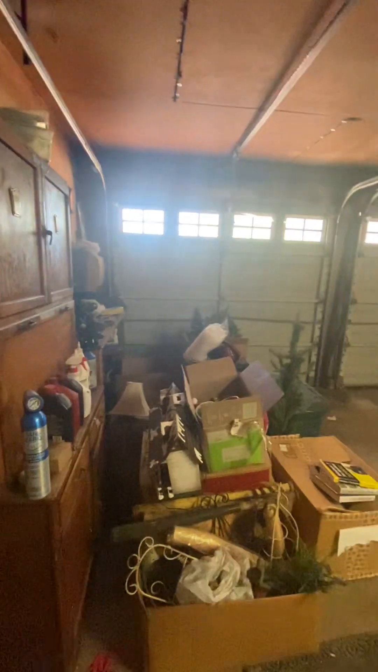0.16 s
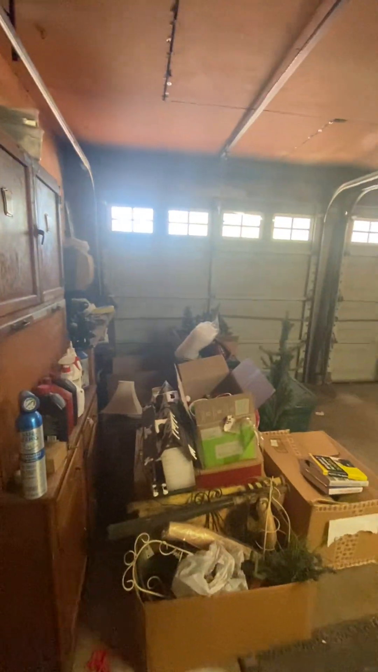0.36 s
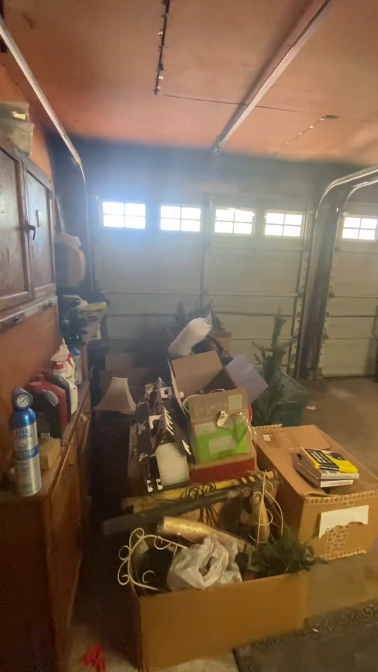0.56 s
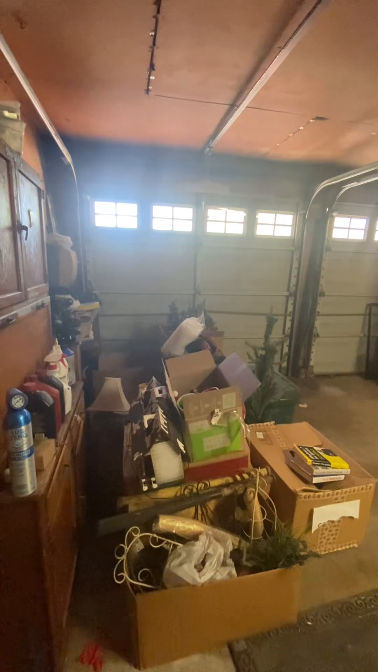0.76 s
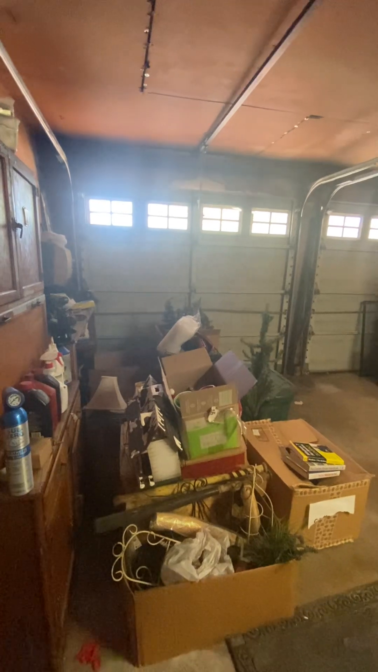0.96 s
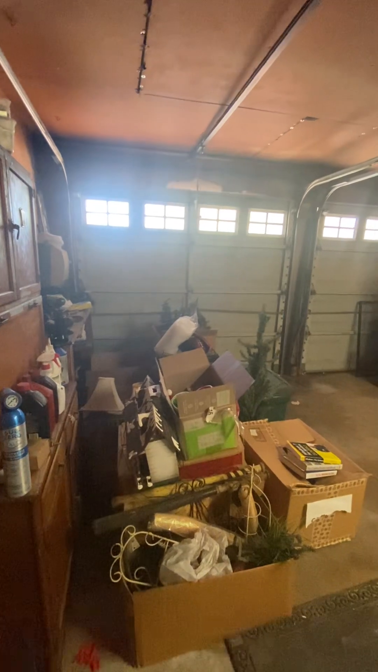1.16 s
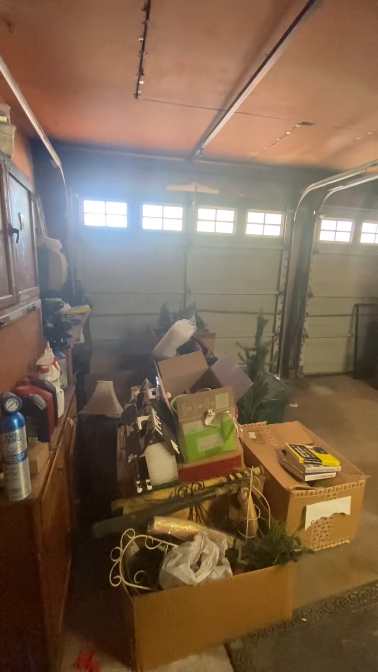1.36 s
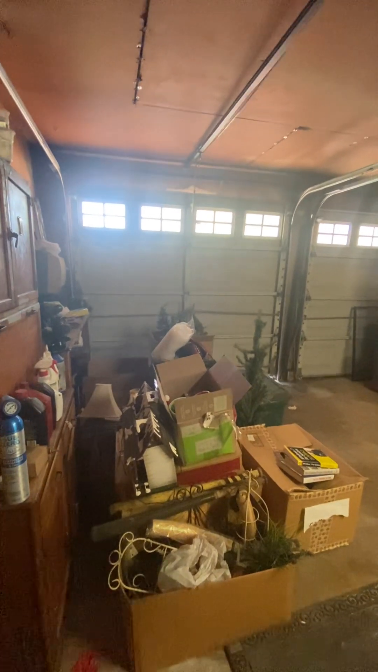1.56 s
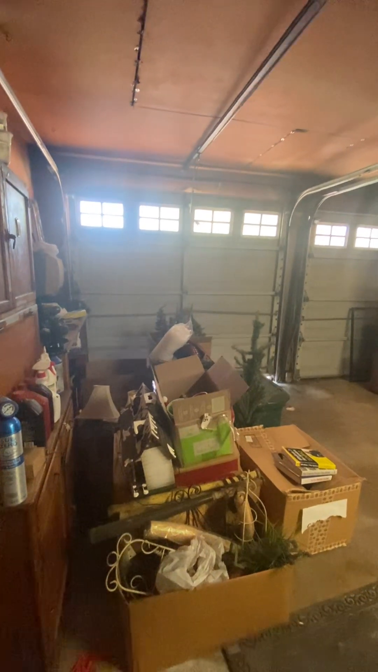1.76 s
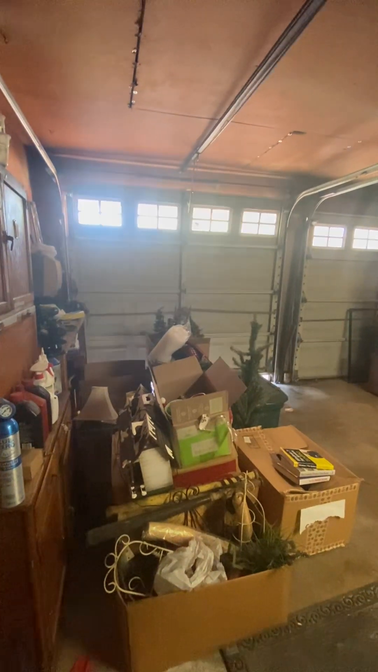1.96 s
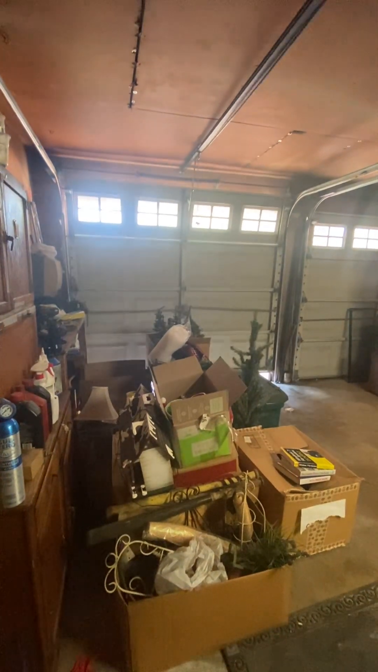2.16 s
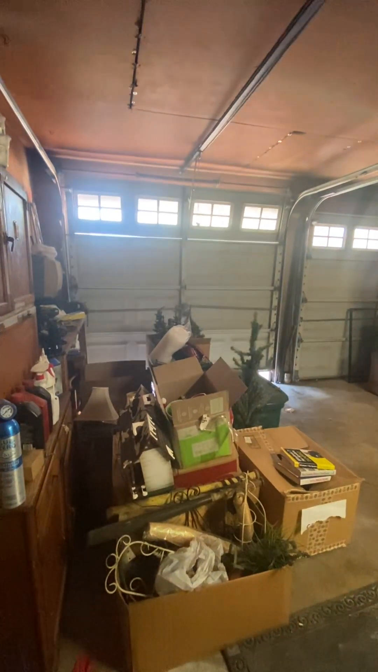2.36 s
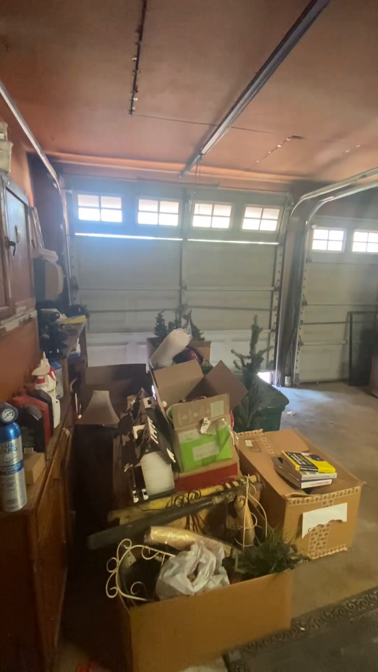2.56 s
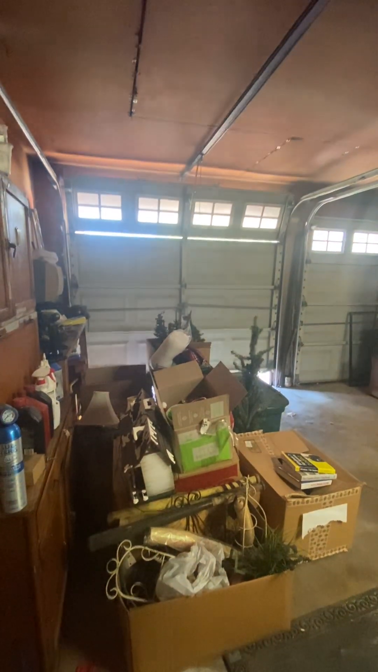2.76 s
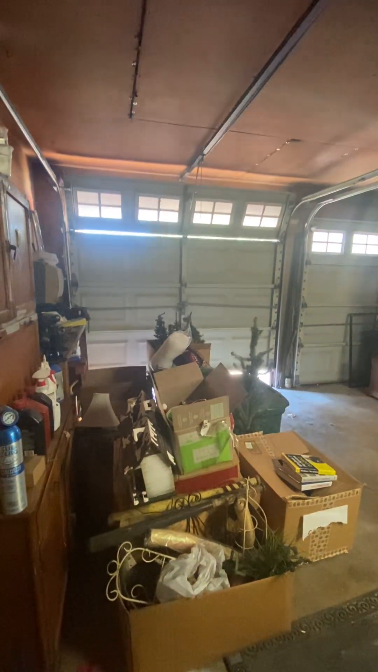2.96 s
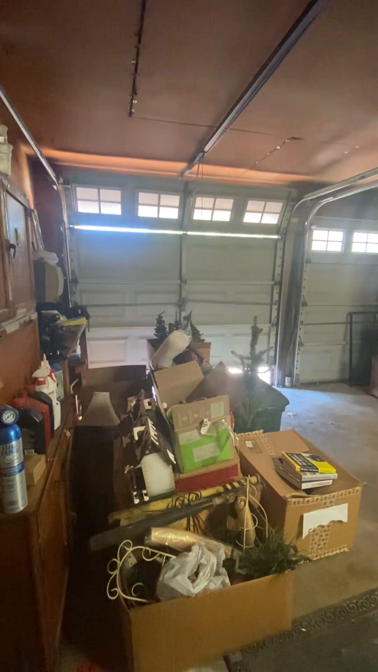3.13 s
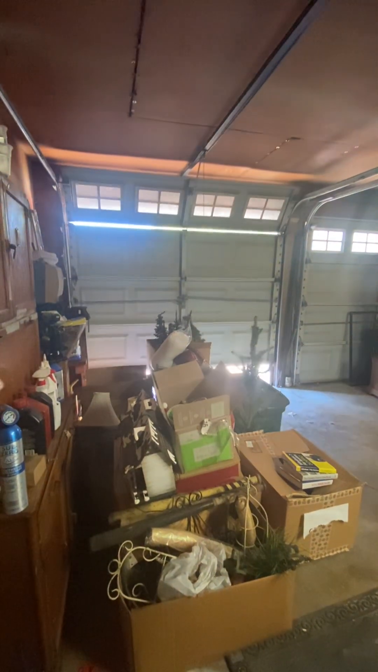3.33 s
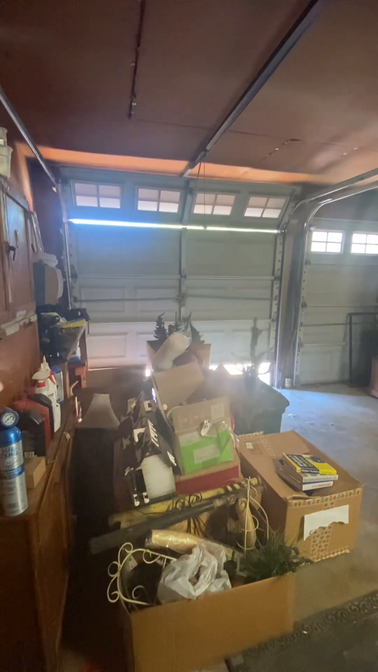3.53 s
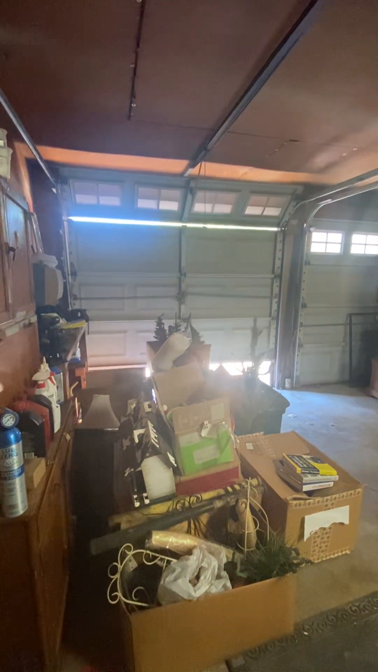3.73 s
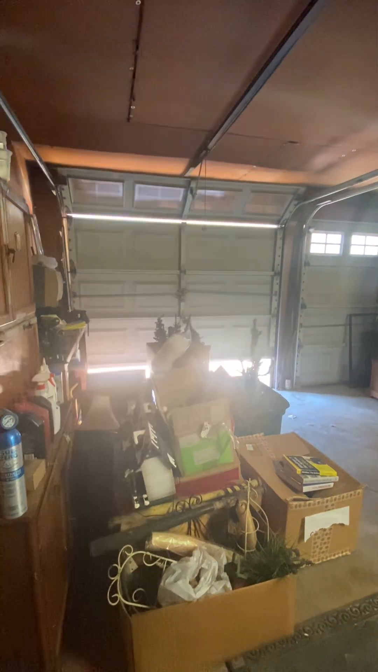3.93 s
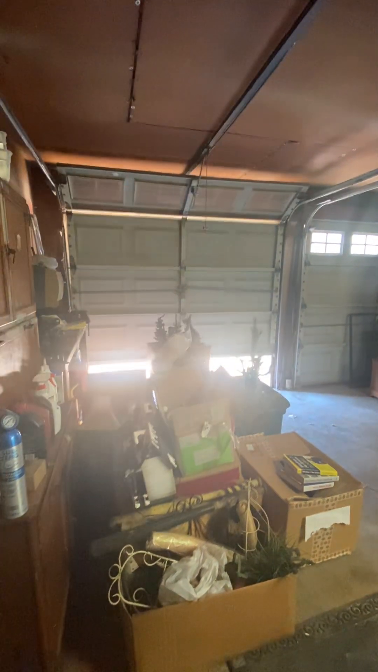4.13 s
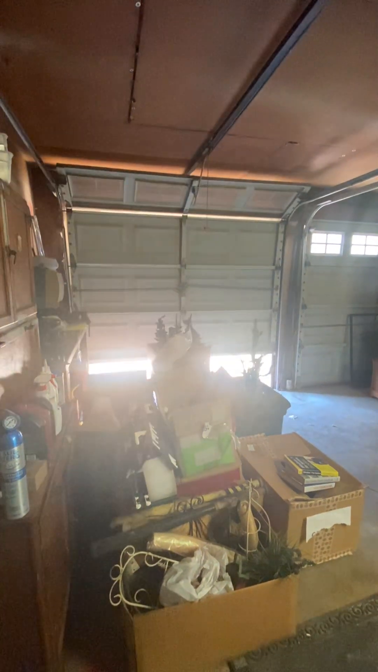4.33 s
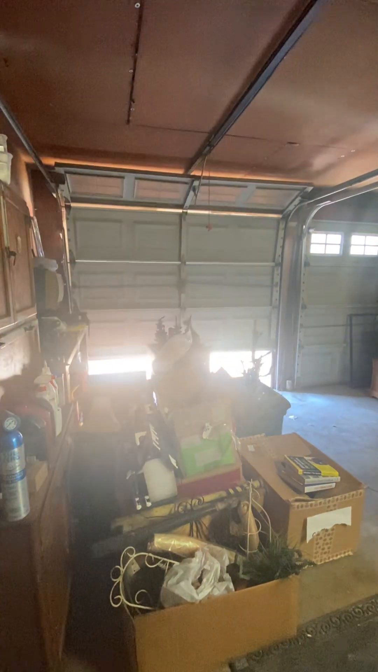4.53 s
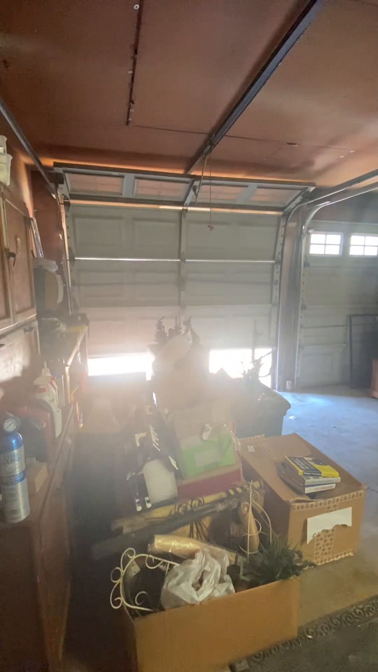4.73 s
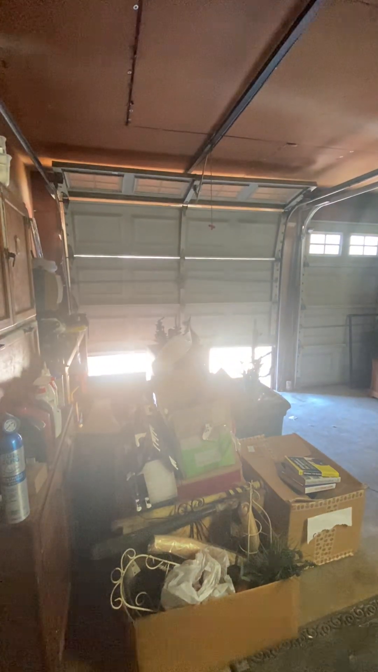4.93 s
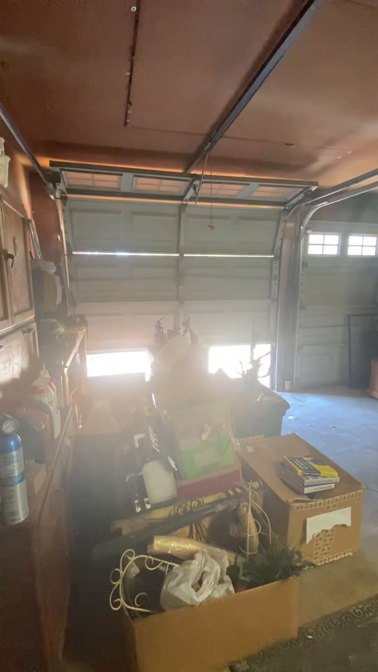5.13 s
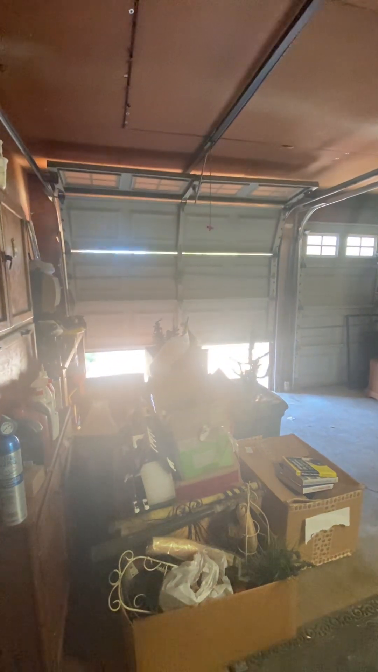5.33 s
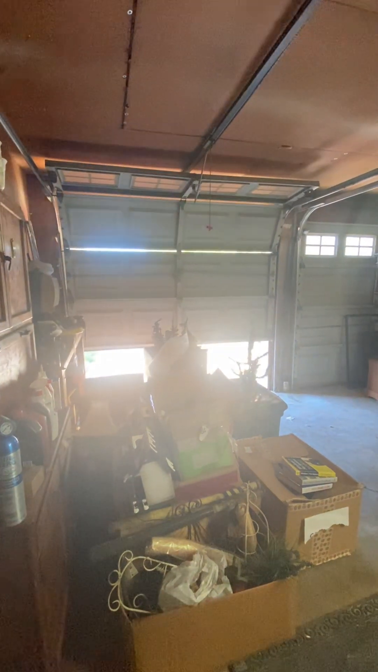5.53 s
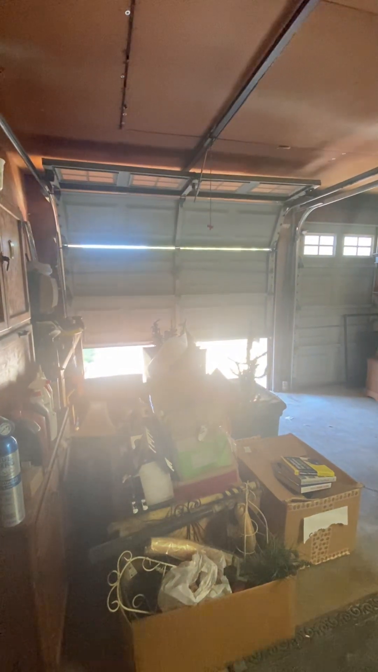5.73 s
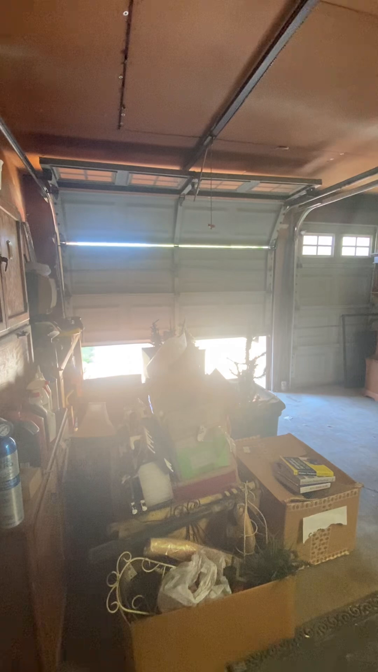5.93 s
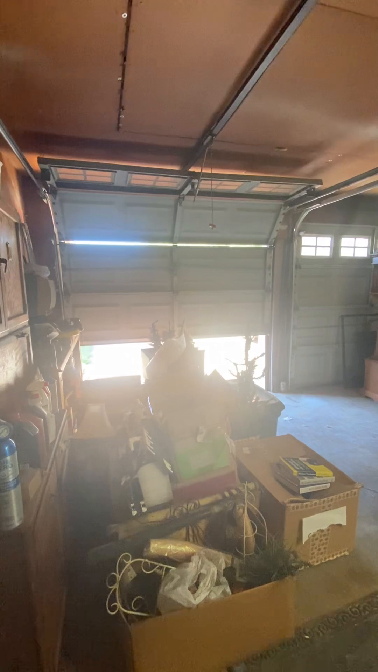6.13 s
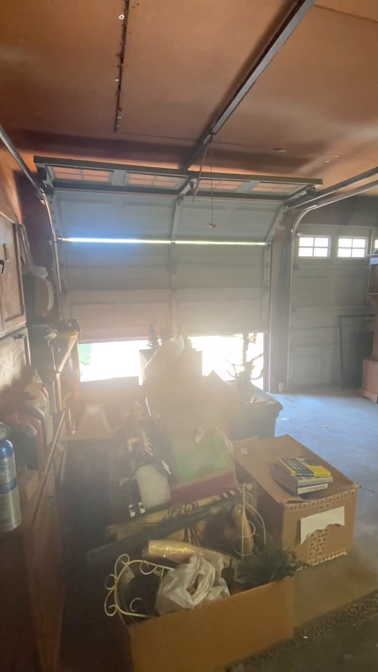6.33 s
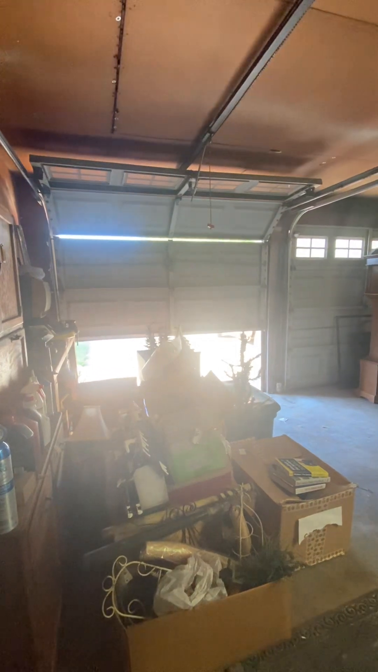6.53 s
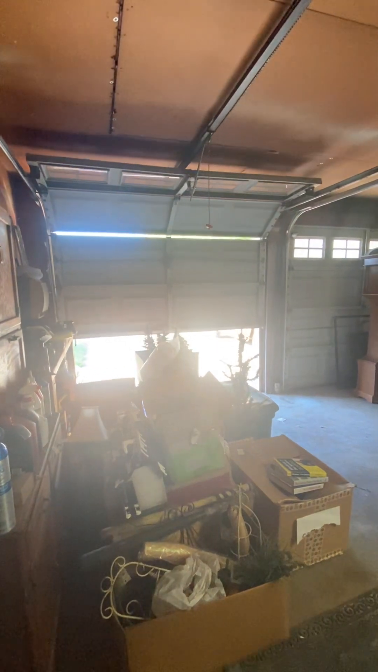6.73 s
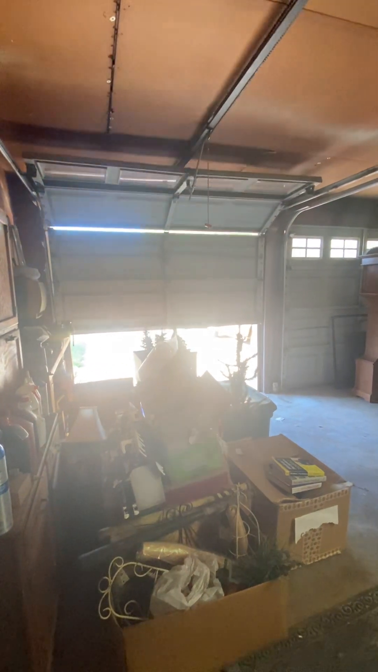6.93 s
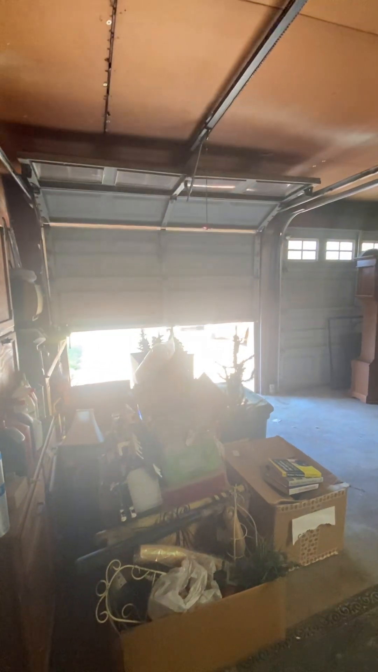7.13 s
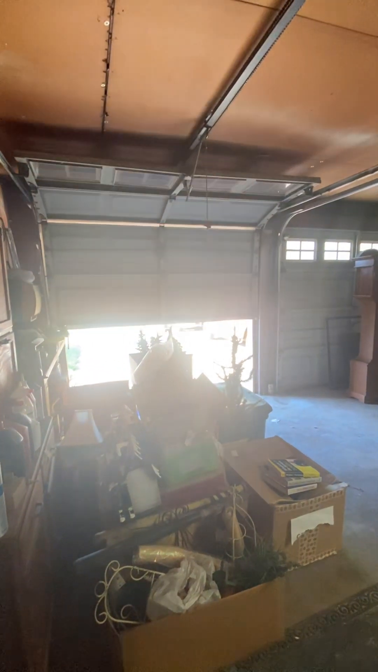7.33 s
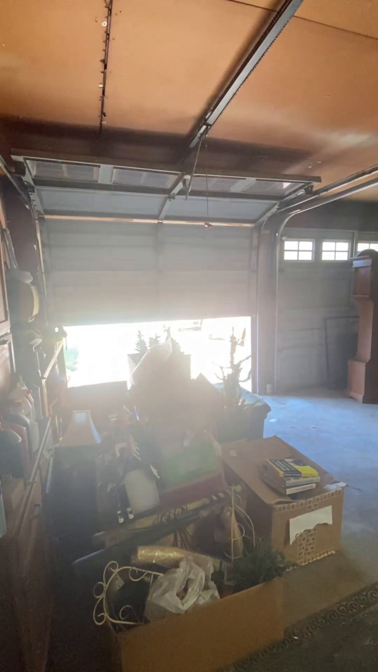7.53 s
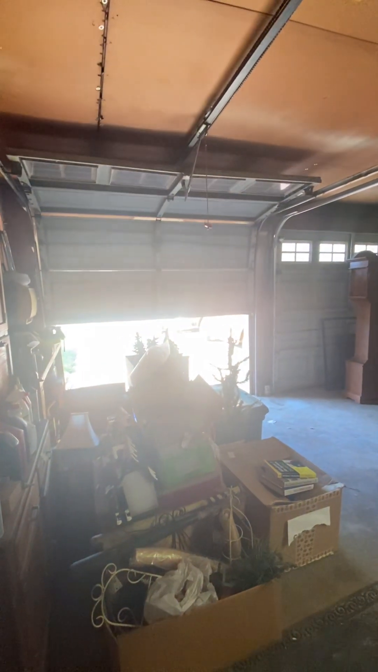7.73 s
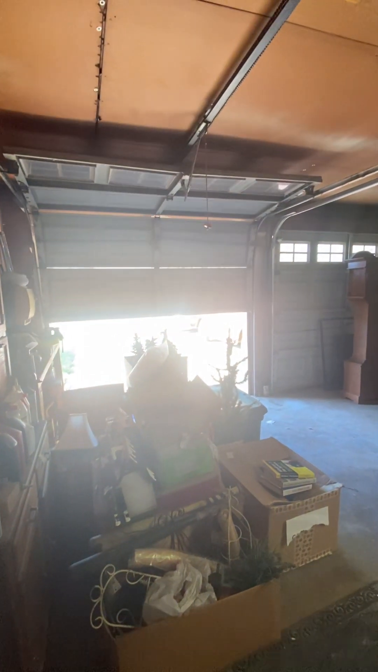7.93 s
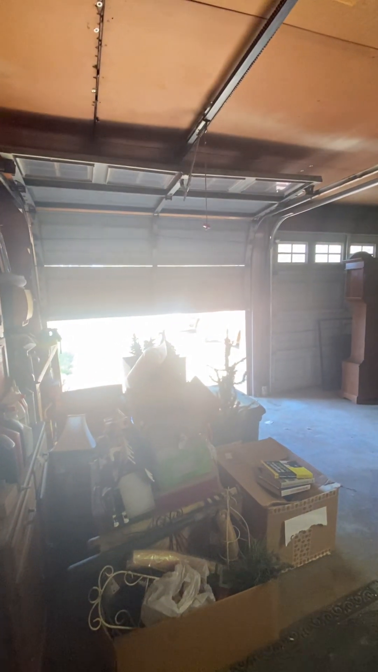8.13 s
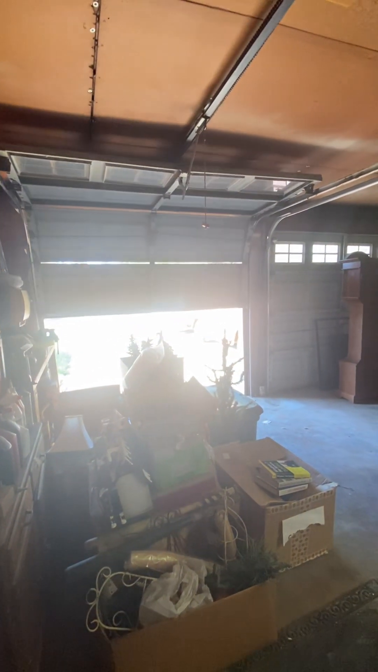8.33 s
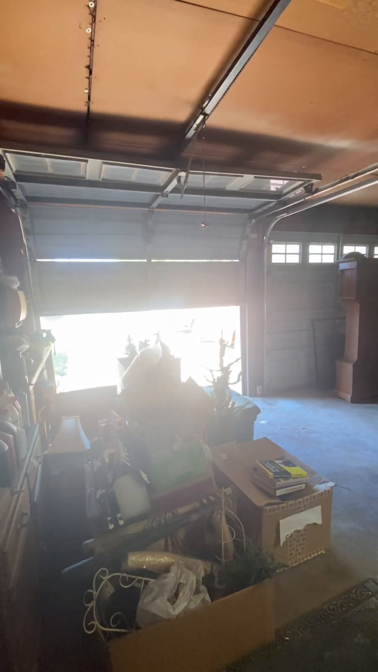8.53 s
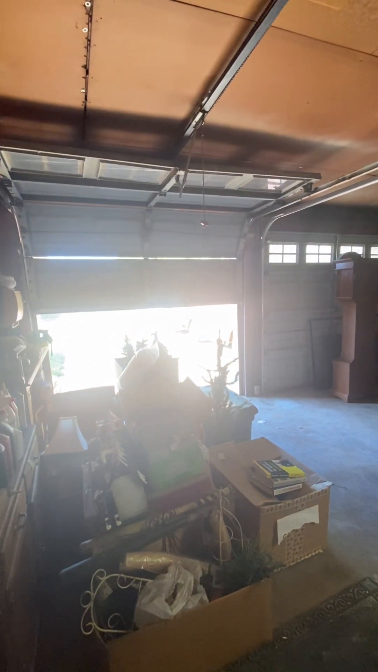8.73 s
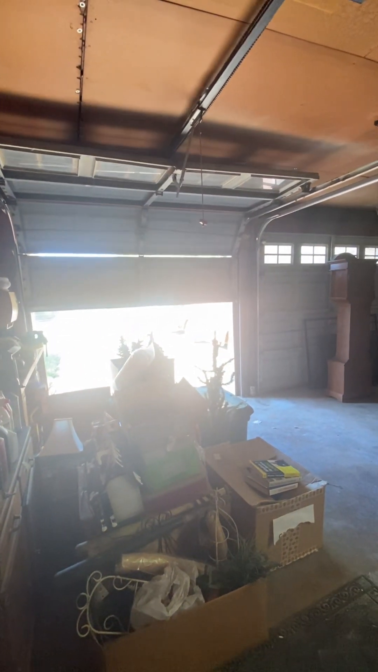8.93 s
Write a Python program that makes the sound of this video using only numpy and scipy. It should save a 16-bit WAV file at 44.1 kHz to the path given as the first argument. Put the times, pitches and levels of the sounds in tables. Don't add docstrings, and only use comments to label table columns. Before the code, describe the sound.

Nearly quiet indoor room with soft cloth rustle and tiny plastic clicks right by the microphone, then a sudden motor start. A mains hum and rough mid-range gear growl fill the resonant garage while a sectional door rises, rumbling and rattling. Early knocks and a cluster of bangs give way to a steadier drone with scattered bright ticks and a slightly more singing tone, still running when it stops.

```python
import sys
import numpy as np
from scipy import signal
from scipy.fft import rfft, irfft, next_fast_len
from scipy.io import wavfile
from scipy.ndimage import uniform_filter1d, map_coordinates

SR = 44100
rng = np.random.default_rng(int(sys.argv[2]) if len(sys.argv) > 2 else 0)


def dump_mix(stems):
    frames = np.atleast_2d(stems).T
    limited = np.clip(frames, -1, 1)
    pcm = np.round(limited * 32767).astype(np.int16)
    wavfile.write(sys.argv[1], SR, pcm)


def nominal_scale(level):
    x = np.asarray(level, float) / 20
    return 10 ** x


N = 396018
T = np.arange(N) / SR
START_S = .843


def unit(x):
    return x / np.sqrt(np.mean(x ** 2) + 1e-20)


def along(points, hz, column=1):
    rows = np.transpose(points)
    return np.interp(np.log(hz + 1), np.log(rows[0] + 1), rows[column])


def curves(rows):
    s, *cols = np.transpose(rows)
    return [np.interp(T, s, c) for c in cols]


def wobble(rate):
    coarse = T[::16]
    knots = rng.standard_normal(int(N * rate / SR) + 4)
    return np.interp(T, coarse, map_coordinates(knots, [coarse * rate]))


def add(track, s, sound):
    track[round(s * SR):][:len(sound)] += sound


def filtered(x, response):
    m = next_fast_len(N + SR // 2)
    return irfft(rfft(x, m) * response(np.fft.rfftfreq(m, 1 / SR)), m)[..., :N]


def body(spectrum, modes=()):
    def response(f):
        power = nominal_scale(2 * along(spectrum, f))
        for centre, width, db in modes:
            power = power + nominal_scale(2 * db) / (1 + (2 * (f - centre) / width) ** 2) ** 2
        return np.sqrt(power)
    return response


def shaken(response, patchy_db, force=1):
    noise = force * rng.standard_normal((2, N))
    if patchy_db:
        z = signal.stft(noise, nperseg=512)[2]
        field = uniform_filter1d(rng.standard_normal(z.shape[1:]), 5, 0)
        field = uniform_filter1d(field, 8, 1)
        noise = signal.istft(z * nominal_scale(patchy_db * unit(field)), nperseg=512)[1][:, :N]
    return unit(filtered(noise, response))


# multiple of twice the mains rate, level in dB,
# left over right in dB, lead of the left in radians.
HUM = [(1, -26.1, -3.4, -0.0), (2, -41.8, -5.0, -0.0), (3, -36.0, -3.9, 0.6), (4, -49.2, -6.5, 1.8),
       (5, -46.0, -0.5, 2.0), (7, -52.2, 4.7, 2.1), (8, -52.1, -1.7, 1.7), (10, -63.3, 12.4, -3.1),
       (12, -66.2, -0.6, 0.4)]
# time in seconds, level in dB.
FIELD = [(.9, -27), (1.35, -24), (1.55, -27), (1.94, -26.5), (2.46, -23.5), (2.69, -27.5), (2.8, -24.5),
         (3.85, -25), (5.12, -27.5), (6.35, -25.5), (8.39, -28.5), (8.55, -27.5), (8.98, -28.5)]
# time in seconds, level in dB.
THIRD = [(.9, -48), (1.5, -38), (2, -37), (2.4, -39), (2.9, -39), (3.4, -38.5), (3.9, -42), (4.3, -39.5),
         (4.6, -34.5), (5.2, -39.5), (5.7, -36), (6.2, -38), (6.6, -35), (7.3, -40.5), (7.7, -38),
         (8, -35.5), (8.5, -42.5), (8.98, -38)]
PULL_HZ = 120
FIELD_S, SWELL_S = .8797, .018


def hum():
    side = np.array([[.5], [-.5]])
    t = T - FIELD_S
    field_db = curves(FIELD)[0]
    out = 0
    for k, db, pan_db, lead in HUM:
        unsteady = k > 1
        drift = unsteady * .3 * wobble(5)
        if k == 3:
            level_db = curves(THIRD)[0] + 1.7 * wobble(13)
        else:
            level_db = field_db - .2 + db - HUM[0][1] + unsteady * 1.2 * wobble(6)
        tone = np.cos(2 * np.pi * k * PULL_HZ * t + drift + side * lead)
        out = out + nominal_scale(level_db + side * pan_db) * tone
    return np.sqrt(2) * out * (1 - np.exp(-np.maximum(t, 0) / SWELL_S)) ** 2


# time in seconds, turns per second.
SHAFT = [(.84, 7.2), (1.0, 27), (1.7, 27.5), (2.7, 27.9), (3.7, 28.05), (4.7, 28.15), (6, 28.35),
         (7.7, 28.15), (9, 28.4)]


def shaft():
    return np.cumsum(curves(SHAFT)[0] + .065 * wobble(2.5)) / SR


# multiple of the pull rate, multiple of the shaft rate, level in dB.
ROTOR = [(0, 1, -66), (0, 2, -58), (0, 4, -56), (1, 1, -53), (0, 6, -56), (0, 8, -50), (3, -4, -51),
         (0, 10, -56), (3, 2, -56), (5, 4, -54), (0, 20, -61), (5, 5, -58), (5, -2.4, -61)]


def rotor(turns):
    out = 0
    for pulls, k, db in ROTOR:
        phase = 2 * np.pi * (pulls * PULL_HZ * T + k * turns)
        out = out + nominal_scale(db + 3.8 * wobble(3)) * np.sin(phase + .37 * wobble(3))
    return out


COVER_HZ, COVER_DB = 353.3, -45
COVER_WAKES_S, COVER_RISE_S, COVER_GAINS_DB = 4.2, .9, 8
LAST_BEND_S, LAST_BEND_DB = 8.5, 4


def cover():
    woken_db = COVER_GAINS_DB / (1 + np.exp((COVER_WAKES_S - T) / COVER_RISE_S))
    freed_db = LAST_BEND_DB * np.clip(10 * (T - LAST_BEND_S), 0, 1)
    level_db = COVER_DB + woken_db + freed_db + 1.2 * wobble(4)
    return nominal_scale(level_db) * np.sin(2 * np.pi * COVER_HZ * T + .6 * wobble(4))


# frequency in Hz, width in Hz, level in dB.
HOUSING = [(226.7, 27, -2.5), (283, 82, -1.5), (342, 56, -1), (365, 25, -4.5), (430, 32, -4),
           (569.7, 37, -1), (656.4, 43, 5), (712.3, 30.6, 6.5), (757, 98, -4.5), (916, 67, -3),
           (1045, 120, -4), (1099, 38, 1.5), (1271, 18, -7.5), (1380, 13, -20.5)]
# frequency in Hz, level in dB per Hz.
GEARS = [(60, -47), (110, -8), (200, -11), (400, -10), (800, -10.5), (1200, -13.5), (1800, -20),
         (3000, -52.5)]


def drive(turns, roar_db):
    mesh = nominal_scale(1.1 * wobble(30) + .27 * np.cos(2 * np.pi * PULL_HZ * T))
    gears = nominal_scale(roar_db + 5) * shaken(body(GEARS, HOUSING), .8, mesh)
    boom = nominal_scale(roar_db - 3.5) * shaken(body([(20, -58.5)], [(356.5, 30, .0068)]), 0)
    tones = nominal_scale(roar_db + 38.5) * rotor(turns) + cover()
    return gears + boom + tones * [[1], [0]]


LASH_DB, LASH_S = 4.5, .004
LASH_ODD = .45


def lash(turns):
    half = np.floor(2 * turns).astype(int)
    count = half.max() + 1
    size = rng.exponential(size=count) ** .5 * np.where(np.arange(count) % 2, LASH_ODD, 1)
    since_s = (turns - half / 2) / curves(SHAFT)[0]
    return LASH_DB * size[half] * np.exp(-since_s / LASH_S)


# frequency in Hz, level in dB per Hz.
PANELS = [(15, -43.5), (30, -38), (55, -2.5), (70, -4), (100, -3), (160, -3.5), (300, -41.5)]
# frequency in Hz, width in Hz, level in dB.
TRACK = [(2364, 100, -3), (2538, 69, 2.5), (2694, 240, -3.5), (3050, 96, 2.5), (3305, 100, -0.5),
         (3697, 49, -2), (4280, 23, -6.5), (4894, 99, -4), (5300, 160, -7), (5600, 89, -24)]
# frequency in Hz, level in dB per Hz.
ROLLERS = [(900, -11.5), (1700, -13), (2300, -5.5), (4000, -7.5), (6000, -14.5), (6400, -22), (9000, -41.5)]
# frequency in Hz, level in dB per Hz.
SIZZLE = [(4000, -30), (6300, -2), (7300, -3), (7800, 1), (8400, -5), (11000, -13.5), (14000, -18),
          (16000, -26)]
RATTLE_DB, RATTLE_GROWS = -38, .6
RUMBLE_DB, RUMBLE_GROWS, RUMBLE_SWAY_DB, RUMBLE_RISE_S = -44, .67, 1.5, .09
SIZZLE_DB = -15.5
STIFF_S, STIFF_DB = 2.2, 2.5


def door(turns, effort_db, rollers_db, panels_db):
    rattle_db = RATTLE_DB + RATTLE_GROWS * effort_db + rollers_db
    rumble_db = RUMBLE_DB + RUMBLE_GROWS * effort_db + panels_db + RUMBLE_SWAY_DB * wobble(7)
    stiff_db = STIFF_DB * np.clip(STIFF_S - T, 0, 1)
    sizzle_db = rattle_db + SIZZLE_DB + .15 * rollers_db + stiff_db
    angle = 2 * np.pi * turns
    jolt = 1.3 * np.cos(2 * angle) + .9 * np.cos(angle + 1.1) + .6 * np.cos(3 * angle)
    knock_db = lash(turns)
    grit, sway = wobble(350), wobble(7.7)
    rattle_force = nominal_scale(.21 * jolt + knock_db + .7 * grit + .52 * sway)
    rattle = shaken(body(ROLLERS, TRACK), 1.6, rattle_force)
    sizzle_force = nominal_scale(.6 * jolt + .7 * knock_db + 1.2 * grit + .8 * sway)
    sizzle = shaken(body(SIZZLE, [(5900, 120, -1), (6900, 150, -1)]), 2.1, sizzle_force)
    rise = np.clip((T - START_S) / RUMBLE_RISE_S, 0, 1)
    rumble = rise * shaken(body(PANELS, [(66.4, 8.8, 2.6)]), 0)
    return nominal_scale(rumble_db) * rumble + nominal_scale(rattle_db) * rattle + nominal_scale(sizzle_db) * sizzle


# time in seconds, length in seconds,
# swell of the gears in dB, of the rollers in dB, of the panels in dB.
SHUDDERS = [(1.036, 0.04, 3, 2, 5.5), (1.621, 0.13, 0.5, 2, 0), (2.236, 0.33, 0.5, 2, 1.5),
            (2.641, 0.038, 1.5, 2, 5), (2.782, 0.045, 5, 1.5, 5.5), (2.911, 0.087, 1, 1, 8),
            (3.288, 0.081, 0.5, -0.5, -1), (3.598, 0.41, -1, -0.5, 4.5), (4.802, 0.16, -0.5, 0.5, 1),
            (6.082, 0.06, 0, 0, -2.5), (6.834, 0.12, .5, 2.5, -0.5), (7.597, 0.11, -0.5, 0.5, -3),
            (8.09, 0.13, -2, -1, 2.5), (8.89, 0.11, 0, 1, 3.5)]


def shudders():
    s, length, *swells = np.transpose(SHUDDERS)
    coarse = T[::64]
    bumps = np.exp(-.5 * ((coarse[:, None] - s) / length) ** 2)
    return [np.interp(T, coarse, bumps @ db) for db in swells]


# time in seconds, frequency in Hz, level in dB.
DRUM = [(1, 282.6, -47.5), (2.3, 273.2, -40.5), (3.1, 282, -43), (4.4, 281.4, -44), (5.2, 286.3, -39.5),
        (6, 281, -46.5), (9, 277.1, -47.5)]


def drum():
    hz, db = curves(DRUM)
    tone = np.sin(2 * np.pi * np.cumsum(hz) / SR + 1.2 * wobble(8))
    return nominal_scale(db + 3 + 3 * wobble(7)) * tone * [[1], [0]]


# frequency in Hz, t60 in seconds.
GARAGE = [(100, 0.75), (1000, 0.75), (4000, 0.24), (12000, 0.022)]


def echoed(x, wet_db):
    hz, t, z = signal.stft(rng.standard_normal((2, SR // 2)), SR, nperseg=256)
    decay = nominal_scale(-60 * t / along(GARAGE, hz)[:, None])
    tail = signal.istft(z * decay, SR, nperseg=256)[1]
    tail = tail / np.linalg.norm(tail[0])
    late = np.pad(x, (200, 0))[None]
    wet = signal.fftconvolve(late, tail, axes=1)[:, :N]
    return nominal_scale(wet_db) * wet + x * [[1], [0]]


# time in seconds, crack in dB, ring in Hz, ring in dB.
TICKS = [(0.85, -42, 7000, -62), (1.073, -60, 7900, -35), (1.438, -44, 8000, -48), (1.576, -37, 9000, -42),
         (1.93, -29, 7900, -39), (2.153, -26, 8340, -50), (2.89, -44, 10000, -50), (3.168, -38, 9100, -55),
         (4.105, -36, 12400, -54), (4.133, -45, 7680, -49), (4.364, -45, 7800, -50),
         (4.506, -41, 7800, -45), (4.678, -47.5, 8000, -48), (5.165, -38, 8000, -48), (5.5, -39, 8070, -46),
         (5.871, -36, 9500, -48), (6.046, -45, 8000, -50), (6.245, -44, 9600, -50), (6.345, -50, 8000, -40),
         (6.558, -43, 8000, -46), (6.771, -27, 8770, -33), (7.552, -35.5, 7750, -43),
         (7.602, -36, 6170, -46), (7.641, -40, 9060, -50), (8.08, -42, 8000, -56), (8.262, -44, 8000, -50),
         (8.43, -39, 8600, -55), (8.556, -29, 7460, -27), (8.71, -39, 8000, -36)]
# time in seconds, crack in dB, ring in Hz,
# ring in dB, ring t60 in seconds.
STEMS = [(1.011, -51, 2867, -16.5, 0.025), (1.03, -50, 3070, -33.5, 0.09), (1.036, -55, 4280, -38, 0.05),
         (1.053, -68, 2750, -30.5, 0.067), (1.511, -42, 4660, -42.5, 0.029), (1.58, -62, 5800, -44, 0.45),
         (1.699, -51, 5920, -39, .2), (2.296, -33, 5370, -24.5, 0.077), (2.721, -49, 2400, -22.5, .034),
         (2.739, -50, 5510, -24.5, 0.05), (2.743, -58.5, 2390, -18, 0.036), (2.769, -54, 2535, -32, .051),
         (2.964, -54, 5400, -32, 0.045), (3.27, -42, 5300, -26, 0.052), (3.273, -57, 5930, -38, 0.044),
         (3.31, -61, 3050, -35, .12), (2.304, -55, 5820, -35, 0.038), (1.509, -55, 3300, -25.5, .04),
         (1.547, -53, 3210, -28, 0.031), (1.585, -50, 3260, -26.5, .035), (1.658, -50, 3350, -24, .04),
         (1.369, -55, 3000, -29, .03), (1.476, -55, 3120, -30, .03), (1.875, -51, 3100, -27, .03),
         (2.054, -52, 3090, -26, 0.033), (2.13, -52, 2970, -28.5, 0.033), (2.2, -52, 3130, -30, .03),
         (2.752, -45, 3770, -30, 0.031), (2.777, -46, 4130, -31, 0.036), (2.797, -46, 3300, -28, .04)]
TICK_T60_S = .014
CRACK_DB, CRACK_T60_S = -6, .05
SCRAPE_DB, SCRAPE_T60_S = -15, .35


def ticks():
    cracks, rings, t = np.zeros(N + SR), np.zeros(N + SR), T[:SR // 2]
    for s, crack_db, hz, ring_db, t60 in [(*row, TICK_T60_S) for row in TICKS] + STEMS:
        noise = rng.standard_normal((2, len(t)))
        snap = nominal_scale(crack_db + CRACK_DB - 60 * t / CRACK_T60_S)
        scrape = nominal_scale(crack_db + SCRAPE_DB - 60 * t / SCRAPE_T60_S)
        add(cracks, s, (snap + scrape) * noise[0])
        chatter = .2 * np.cumsum(noise[1])
        swing = np.sin(2 * np.pi * hz * t + chatter)
        add(rings, s, nominal_scale(ring_db - 60 * t / t60) * (1 - np.exp(-t / .0015)) * swing)
    bright = signal.butter(2, [5200, 13500], "band", fs=SR, output="sos")
    return signal.sosfilt(bright, cracks) + rings


# time in seconds, level in dB, frequency in Hz, t60 in seconds.
THUDS = [(1.3, -39, 98, 0.17), (2.9, -38, 87, 0.17), (2.775, -31, 69, 0.53), (2.765, -21, 170, 0.086),
         (5.4, -27, 930, 0.029), (3.6, -44, 2200, 0.075), (3.26, -30, 205, 0.2), (3.322, -33, 225, 0.099),
         (3, -30, 200, 0.13), (1.0, -43, 38, 0.96), (2.62, -41, 40, 0.96), (1.0, -30, 310, 0.11),
         (2.79, -29, 350, 0.11), (2.84, -33.5, 66, .5), (2.64, -34, 60, 0.18), (0.89, -32, 725, .12),
         (3.9, -32, 2500, 0.055), (2.685, -30, 1050, 0.045), (.86, -23.5, 350, 0.099)]


def thuds():
    out, t = np.zeros(N + SR), T[:SR // 2]
    for s, db, hz, t60 in THUDS:
        add(out, s, nominal_scale(db - 60 * t / t60) * (1 - np.exp(-t / .0058)) * np.sin(2 * np.pi * hz * t))
    return out


# time in seconds, level in dB, t60 in seconds.
BANGS = [(1.012, -32.5, 0.18), (1.045, -33.5, .12), (2.298, -36, 0.072), (2.722, -31, .06),
         (2.714, -29, 0.12), (2.741, -21, 0.075), (2.758, -27.5, 0.055), (2.785, -35, .06),
         (2.8, -32.5, 0.054), (3.272, -30.5, 0.1), (2.769, -33, 0.37), (6.778, -35, 0.33)]


def slaps():
    out, t = np.zeros(N + SR), T[:SR // 2]
    for s, db, t60 in BANGS:
        bounce_db = 3.4 * np.cos(2 * np.pi * 115 * t)
        add(out, s, nominal_scale(db - 60 * t / t60 + bounce_db) * rng.standard_normal(len(t)))
    return signal.sosfilt(signal.butter(1, [500, 5000], "band", fs=SR, output="sos"), out)


def hinges():
    return echoed((ticks() + thuds() + slaps())[:N], -.24)


# time in seconds, peak in dB, 1 for going down or 0 for springing back,
# brightness in dB per octave.
CLICKS = [
    (.139, -58, 1, 6),
    (0.19, -45, 0, -3),
    (.251, -59, 0, -4),
    (.2925, -50, 1, 0),
    (0.7477, -45, 1, 4),
    (0.7808, -42.5, 0, 1),
]
# frequency in Hz, level going down in dB, level springing back in dB,
# t60 in seconds.
CASE = [(1640, -11, -10, 0.046), (2300, -1, 2.5, 0.028), (2490, -4, 1, 0.06), (3140, -12, -6, .04),
        (3560, -2, -11, 0.084), (3910, -15, -11, .05), (4590, -12, -7, .04), (4940, -6, -14, .04),
        (5600, -4, -9, .08), (6140, -1, -10, .04), (6500, -14, -6, .03), (7040, -5, -14, .035),
        (8170, -4, -16, .03), (9340, -16, -20, .03)]
# time in seconds, level in dB, frequency in Hz, t60 in seconds.
KNOCKS = [
    (.005, -62, 250, .12),
    (.13, -58, 260, .1),
    (.26, -60, 365, 0.17),
    (.26, -65, 490, 0.13),
    (.53, -67, 395, .15),
    (.57, -66, 360, .1),
]
SNAP_DB, BUTTON_ROOM_DB = -6, -18.5
BLOW, BLOW_S = 1.5, .002


def button():
    clicks, t = np.zeros(N), T[:SR // 8]
    hz, down_db, back_db, t60 = np.transpose(CASE)[..., None]
    for s, db, down, tilt_db in CLICKS:
        levels_db = (down_db if down > .5 else back_db) + tilt_db * np.log2(hz / 2500)
        modes = np.sin(2 * np.pi * (hz * t + rng.random(hz.shape)))
        ring = (nominal_scale(levels_db - 60 * t / t60) * modes).sum(axis=0)
        ring = ring * (1 + BLOW * np.exp(-t / BLOW_S))
        snap = nominal_scale(SNAP_DB - 60 * t / .012) * rng.standard_normal(len(t))
        add(clicks, s, nominal_scale(db) * (1 - np.exp(-t / .00069)) * (ring + 2 * snap))
    for s, db, knock_hz, knock_t60 in KNOCKS:
        swing = np.sin(2 * np.pi * knock_hz * t)
        add(clicks, s, nominal_scale(db - 60 * t / knock_t60) * (1 - np.exp(-t / .006)) * swing)
    soft = signal.sosfilt(signal.butter(2, 10000, fs=SR, output="sos"), clicks)
    return echoed(soft, BUTTON_ROOM_DB)


# time in seconds, peak in dB, rise in seconds,
# fall t60 in seconds, hollow resonance in Hz.
STROKES = [(0, -76, .01, 0.77, 1200), (.117, -63.5, .006, 0.7, 2720), (.14, -57, 0.026, 0.29, 5600),
           (.2, -61.5, .02, 0.49, 2400), (.3, -58, 0.013, 0.27, 3860), (.565, -67, 0.036, 0.11, 3000),
           (.575, -71, .03, 0.34, 1200), (.749, -52.5, 0.0067, 0.32, 5600), (.783, -54, .004, 0.31, 2400),
           (.829, -52.5, 0.0073, 1, 7300), (.83, -57.5, .006, 0.45, 3300)]
RUSTLE_FLOOR_DB = -83.5


def brushing():
    strokes = []
    for s, db, rise, t60, _ in STROKES:
        fall_db = np.where(T < s, 20 * (s - T) / rise, 60 * (T - s) / t60)
        strokes.append(nominal_scale(db - fall_db))
    return strokes


# frequency in Hz, level in dB per Hz.
CLOTH = [(290, -40), (500, -3), (1470, -5), (2740, -3.5), (5190, -10), (5620, -9.5), (7140, -15),
         (12000, -22.5), (15600, -44), (22000, -120)]


def rustle(strokes, touch):
    out = nominal_scale(-2.5) * touch * shaken(body(CLOTH), 2, nominal_scale(2.4 * wobble(300)))
    for stroke, row in zip(strokes, STROKES):
        hollow = signal.butter(2, [.86 * row[-1], 1.16 * row[-1]], "band", fs=SR, output="sos")
        noise = rng.standard_normal((2, SR))
        out[:, :SR] += stroke[:SR] * unit(signal.sosfilt(hollow, noise))
    return out


# frequency in Hz, level in dB per Hz.
QUIET = [(12, -44.5), (20, -17), (43, -4.5), (74, 3.5), (128, -13), (170, -16.5), (198, -16.5),
         (364, -20.5), (700, -45.5), (910, -63), (1540, -120)]
# frequency in Hz, width in Hz, level in dB.
FAR_HUM = [(173.6, 4.1, 0.5), (89, 8, 2), (57.7, 8.7, 3.5)]
MURMUR_DB, MURMUR_RUNNING_DB = -61.5, 10.5
MURMUR_FOLLOWS = .23


def murmur(touch, powered):
    level = nominal_scale(MURMUR_DB + MURMUR_RUNNING_DB * powered + .8 * wobble(29))
    handling = (touch / nominal_scale(RUSTLE_FLOOR_DB)) ** MURMUR_FOLLOWS
    return level * handling * shaken(body(QUIET, FAR_HUM), 0)


def standby(powered):
    strokes = brushing()
    touch = nominal_scale(RUSTLE_FLOOR_DB) + sum(strokes)
    return button() + rustle(strokes, touch) + murmur(touch, powered)


# frequency in Hz, likeness from 0 to 1, lead of the left in radians,
# left over right in dB.
PORTS = [(60, .98, -.1, -1.6), (250, .98, .1, -5.2), (430, .84, .8, -4.6), (690, .89, 2.3, 1.6),
         (1150, .68, 2.1, 3.2), (1750, .55, 1.0, 1), (2600, .84, 2.0, .2), (3300, .8, 2.3, -.2),
         (4000, .45, 1.3, -1.2), (5000, .65, 3.4, -.3), (6500, .36, 1.6, -1), (7800, .78, 2.7, 1),
         (13000, .5, 3.1, 0), (15500, .6, 5.9, 0)]


def ports(pair):
    def split(f):
        turn = np.arccos(np.clip(along(PORTS, f), 0, 1)) / 2
        return np.array([np.cos(turn), np.sin(turn)])

    def lean(f):
        half = nominal_scale(along(PORTS, f, column=3) / 2) * np.exp(.5j * along(PORTS, f, column=2))
        return np.array([half, 1 / half])

    same, other = filtered(pair, split)
    return filtered([same + other, same - other], lean)


# time in seconds, level in dB.
LOAD = [(.83, -40), (.87, -45), (.95, -42), (1.05, -36.5), (2.6, -36), (3.6, -35), (5.2, -37), (6, -37),
        (7.6, -36.5), (8.98, -37.5)]


def scene():
    turns = shaft()
    powered = np.clip((T - START_S) / .03, 0, 1)
    load_db = curves(LOAD)[0]
    gears_db, rollers_db, panels_db = shudders()
    motor = drive(turns, load_db + gears_db)
    moving = door(turns, load_db - LOAD[-1][1], rollers_db, panels_db)
    running = motor + moving + drum()
    return hum() + ports(powered * running + hinges() + standby(powered))


# frequency in Hz, margin of the sum in dB, margin of the difference in dB.
MARGINS = [(3000, -9, -12), (4300, -6, -10), (5000, -3.6, -9), (7500, -2.7, -6.5), (8200, -.3, -5),
           (8500, 13, -6), (9400, 17, -5), (9700, 19, -4.5), (11500, 15, -2.2), (12500, 4.5, -1),
           (14000, -.3, 0), (14600, .3, 2), (15300, 3.5, 5), (15750, 6, 8), (15800, 90, 90)]
# time in seconds, upper limit in Hz.
SPARED = [(.13, 15800), (.15, 14000), (.175, 15000), (.19, 15000), (.845, 15800), (1.635, 9600),
          (2.29, 15800), (2.73, 15800), (3.168, 15800), (2.66, 9400), (3.76, 9000), (4.92, 9000),
          (5.872, 9600), (6.1, 9000), (6.26, 9600), (8.17, 8900), (6.775, 9700), (8.56, 9500)]
QUIET_KEPT_HZ = 9700
LINES_HZ, LINES_DB = 4300, -7


def weak_treble_dropped(dry):
    lead, width = 1024 - 487, 10
    pair = np.pad([dry[0] + dry[1], dry[0] - dry[1]], ((0, 0), (lead, 0))) / 2
    hz, times, z = signal.stft(pair, SR, "cosine", nperseg=2048)
    member = np.arange(len(hz)) // width
    bands = np.add.reduceat(abs(z) ** 2, np.arange(0, len(hz), width), axis=1)
    power = bands[:, member]
    usual = signal.medfilt(bands, [1, 1, 13])[:, member]
    centre = (member + .5) * width * hz[1]
    margin_db = np.array([along(MARGINS, centre), along(MARGINS, centre, column=2)])
    bass = (hz < MARGINS[0][0])[:, None]
    kept = (power > usual * nominal_scale(2 * margin_db)[..., None]) | bass
    strong = abs(z[0]) ** 2 > power[0] / width * nominal_scale(2 * LINES_DB)
    kept[0] &= strong | (hz < LINES_HZ)[:, None]
    now = times - lead / SR
    kept |= (now < START_S) & (hz < QUIET_KEPT_HZ)[:, None]
    for s, top_hz in SPARED:
        kept |= (abs(now - s) < 512 / SR) & (hz < top_hz)[:, None]
    mid, side = signal.istft(z * kept, SR, "cosine", nperseg=2048)[1][:, lead:lead + N]
    return np.array([mid + side, mid - side])


def band_limit(x):
    return signal.sosfilt(signal.butter(12, 16010, fs=SR, output="sos"), x)


def record(dry):
    mix = weak_treble_dropped(dry)
    return band_limit(mix)


dry = scene()
out = record(dry)
dump_mix(out)
```